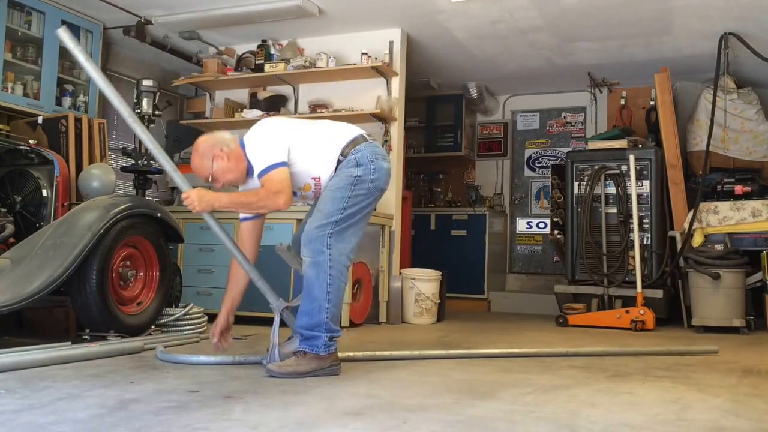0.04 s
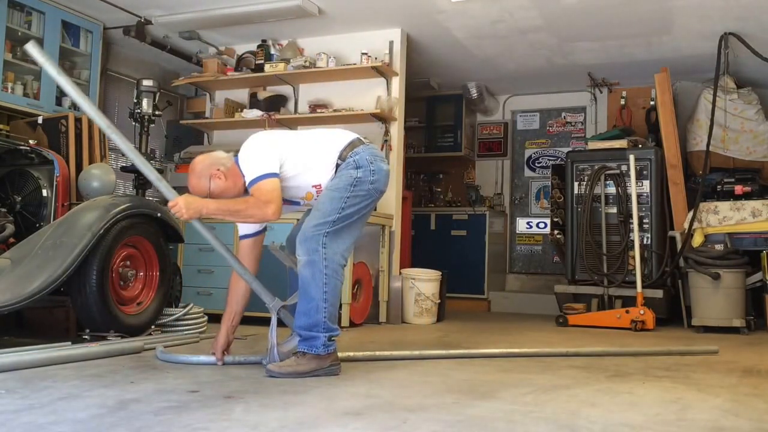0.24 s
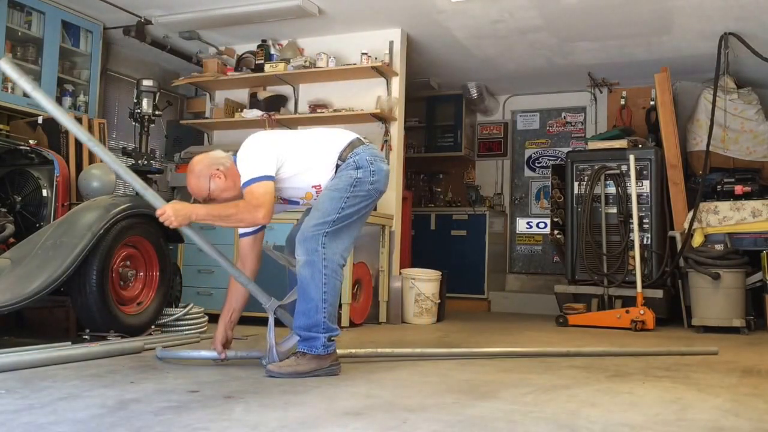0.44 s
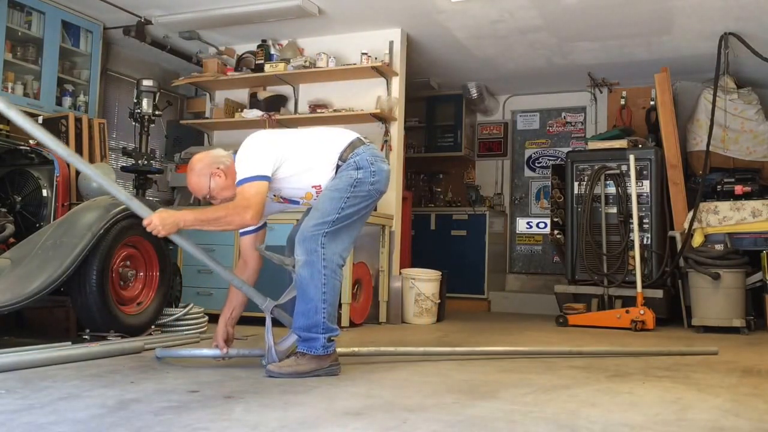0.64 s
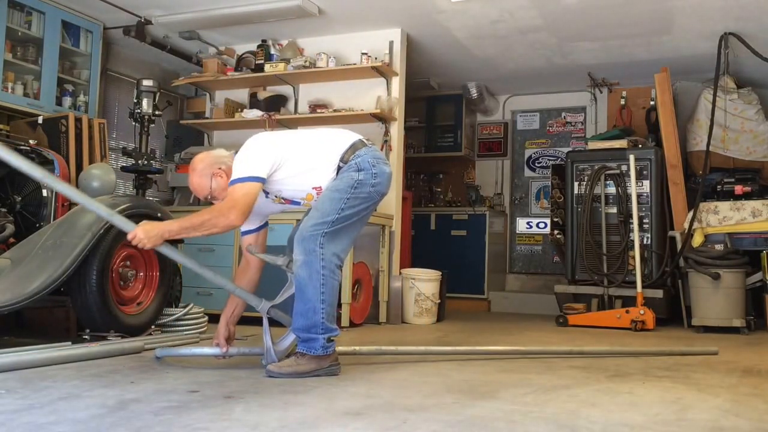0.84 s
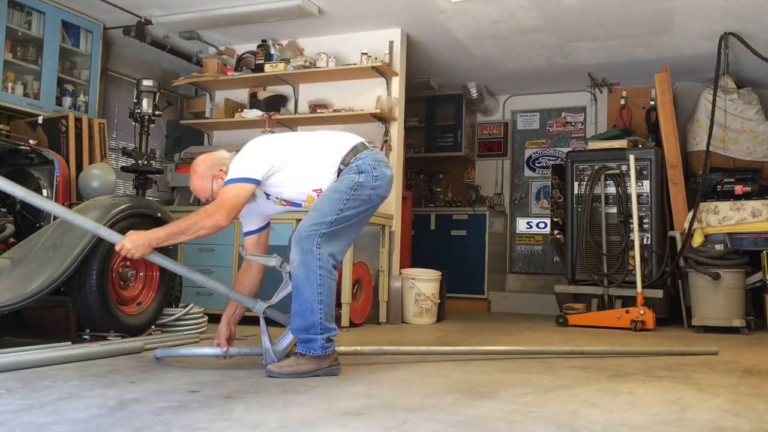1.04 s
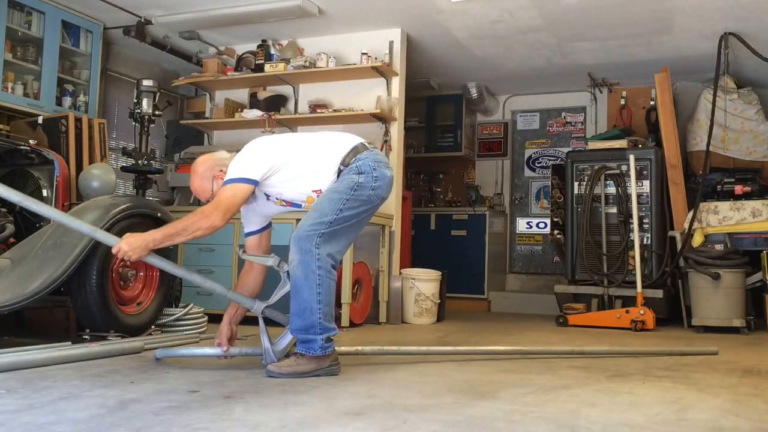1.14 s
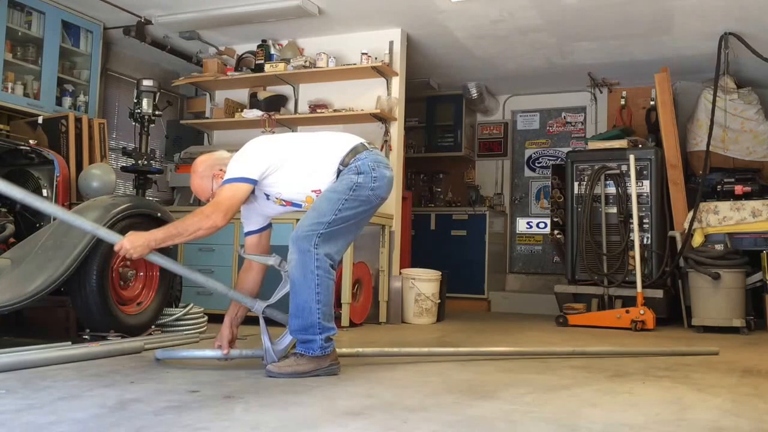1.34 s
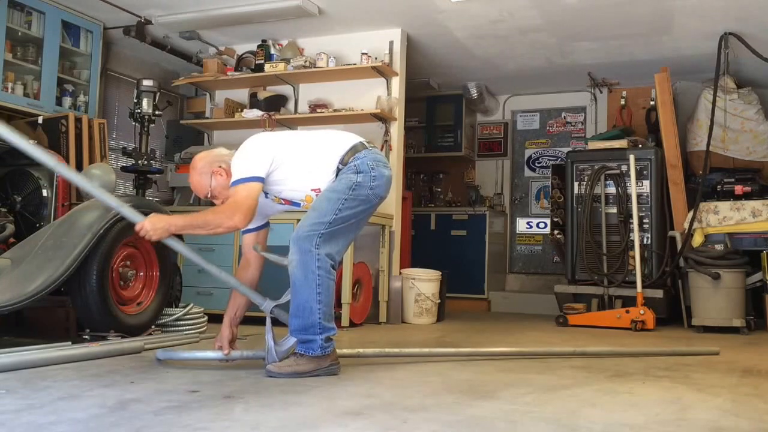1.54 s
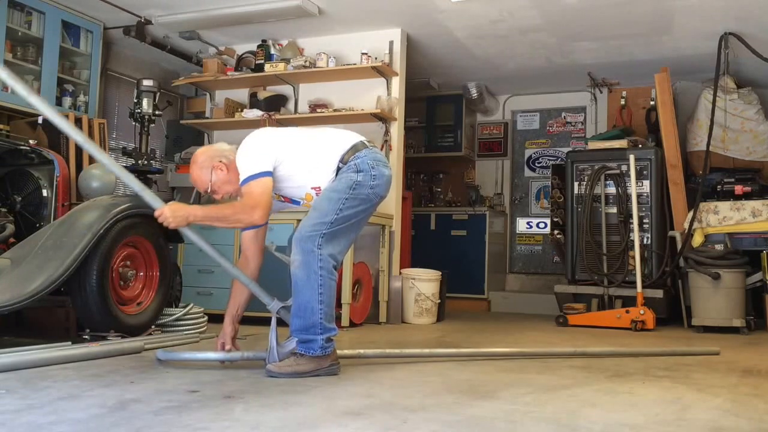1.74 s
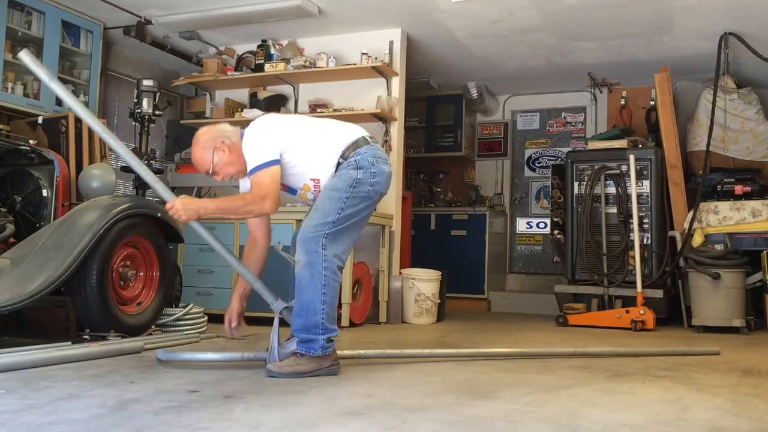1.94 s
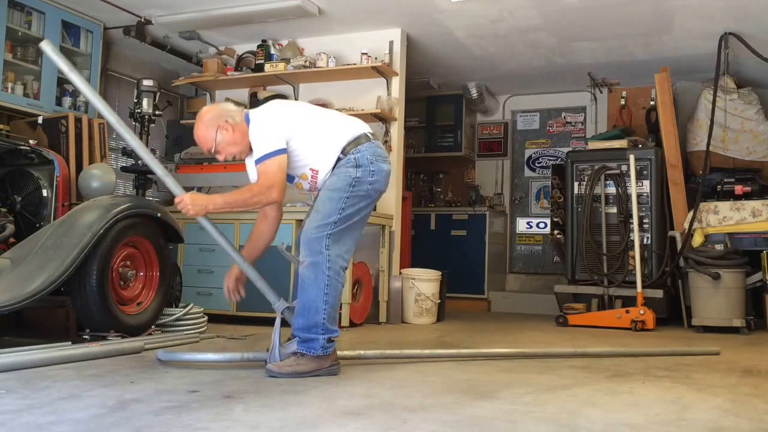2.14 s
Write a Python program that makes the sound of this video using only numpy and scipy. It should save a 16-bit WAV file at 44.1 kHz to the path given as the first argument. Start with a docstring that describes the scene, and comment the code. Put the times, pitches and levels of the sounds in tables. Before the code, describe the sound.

Steel conduit in a hand bender clanks and scrapes on a concrete garage floor in ringing clusters

```python
"""Room air and a low, wavering hum, made of shaped noise and sines, are heard from the start in a garage.
From 0.4 s a long steel conduit in a hand bender knocks on the concrete floor in clusters. Each knock
excites bending modes, a dense wall ring, a clack, a thud and a tick, and feeds one long beating high tone.
Between the clusters the tube scrapes along, made of many tiny catches that excite the same resonances.
Near 1.8 s a soft noise swish swells as the handle swings back; at 1.9 s a faint sine whine comes up."""
import sys
import numpy as np
from scipy import signal
from scipy.fft import rfft, irfft
from scipy.io import wavfile

SR = 44100
rng = np.random.default_rng(int(sys.argv[2]) if len(sys.argv) > 2 else 0)


def dump(signal):
    """Clip the signal to [-1, 1] and save it as 16-bit WAV at the path in sys.argv[1]."""
    limited = np.clip(np.atleast_2d(signal).T, -1, 1)
    pcm = np.round(limited * 32767).astype(np.int16)
    wavfile.write(sys.argv[1], SR, pcm)


N = 96623
RING_COUNT = 36000  # samples in one ring
AGE = np.arange(RING_COUNT) / SR  # seconds since a blow
TIME = np.arange(N) / SR

# Spectrum of the room air: pitch_hz, relative level_db
AIR_SPECTRUM = [(20, -18), (40, -6.5), (60, -5), (75, 11), (95, -14), (140, 0), (200, -10), (350, -15.5),
                (600, -19), (1200, -22), (4000, -27), (8000, -36), (15000, -47.5)]
AIR_DB = -56.5
# Steady tones of the hum: pitch_hz, mean level_db
HUM_TONES = [(75, -64.5), (118.5, -63.5), (494, -77)]
HUM_WAVER_DB = 1.5

# Strength of the drag over time: time_s, level_db (before the gain of each resonance)
DRAG_LEVEL = [(.37, -68.5), (.40, -38), (.46, -50), (.58, -42.5), (.66, -40.5), (.80, -40.5), (.88, -68.5),
              (.99, -49), (1.04, -48.5), (1.12, -58.5), (1.17, -52.5), (1.24, -40.5), (1.38, -34.5),
              (1.50, -65.5), (1.60, -68), (1.75, -76)]
GRAINS_PER_S, GRAIN_SPREAD_DB = 900, 2
STROKE_COUNT = 4410  # samples in one short stretch of the drag
DRAG_BENDING_DB, DRAG_WALL_DB, DRAG_TICK_DB, DRAG_RASP_DB = -7.5, -8, -5.5, -4.5
# Spectrum of the low rasp of the drag: pitch_hz, relative level_db
RASP_SPECTRUM = [(50, -22.5), (150, 4.5), (480, 0), (1000, 7), (2100, -8), (2700, -26)]

# Knocks: start_s, bending_db, blow_centre_hz, wall_db, thud_db, tick_db,
# favoured_mode_hz (the mode that the struck spot favours), favoured_db
KNOCKS = [(.390, -41, 1390, -63, -47.5, -52, 1321, -43), (.411, -30, 1850, -23, -43.5, -31, 2621, -51),
          (.428, -27.5, 1500, -34, -39.5, -51, 2342, -32.5), (.522, -47, 1520, -37, -76, -50, 1584, -42.5),
          (.549, -40.5, 1090, -43, -55, -62, 2621, -45), (0.579, -49, 1490, -42, -54, -80, 3025, -41),
          (0.701, -29, 840, -31, -35, -40, 1112, -33.5), (.721, -28.5, 1300, -27, -57, -36.5, 1840, -40.5),
          (.742, -28, 1450, -38.5, -43.5, -49, 1584, -29),
          (.759, -31.5, 1230, -24.5, -38, -39.5, 1321, -32),
          (.783, -29.5, 1310, -31.5, -48.5, -44, 1584, -34), (.799, -32, 1160, -41, -50, -48.5, 1112, -37),
          (.818, -36, 1270, -53.5, -45.5, -61, 1321, -37), (.845, -58, 1460, -59.5, -48, -78, 3025, -34),
          (0.867, -46, 1600, -62, -48, -76.5, 1584, -31), (1.026, -41, 1030, -43.5, -43, -54.5, 3025, -43),
          (1.05, -44, 1200, -53, -45, -70, 1584, -42.5), (1.25, -33.5, 1370, -30, -37.5, -37.5, 1840, -34),
          (1.279, -19.5, 1130, -25, -33, -31.5, 1112, -19.5),
          (1.299, -30, 1160, -25, -51, -31.5, 1321, -23.5),
          (1.350, -24.5, 1630, -19.5, -39, -25, 1840, -34),
          (1.360, -23, 2100, -19, -30.5, -23.5, 2342, -20),
          (1.396, -26.5, 1680, -22.5, -63, -33.5, 1840, -31), (1.43, -32, 1620, -29, -45, -40, 3025, -27),
          (1.486, -44, 1600, -59, -58, -48, 2102, -48), (1.55, -60.5, 1610, -48, -65, -76, 1584, -41.5),
          (2.181, -55.5, 1200, -58, -62.5, -71, 1584, -56)]
BLOW_WIDTH_OCT, MODE_SCATTER_DB = 0.67, 1
# Bending modes of the tube: pitch_hz, relative level_db, t60_s
BENDING_MODES = [(484, -1.5, 0.19), (562.5, -1, 0.13), (731, -1.5, 0.4), (898.6, 3, 0.21), (954, 0, 0.25),
                 (1118.5, 0.5, 0.22), (1150, -6, 0.56), (1326, 2, 0.24), (1568, -3.5, 0.49),
                 (1586, -2.5, 0.4), (1837, 5.5, 0.2), (2094, 1, 0.29), (2343.5, -6.5, 0.67),
                 (2610, -3.5, 0.83), (2830, -13.5, 0.37)]
PAIR_SPLIT_HZ = 1.1  # a bent tube has its bending modes in close pairs
# The waves need time to fill the tube: time constants in seconds
BENDING_RISE_S, FAVOURED_RISE_S, CLACK_RISE_S = 0.0044, 0.0065, 0.0025
# The tube settles on the floor, which damps its bending modes:
# start_s, end_s, above_hz (only higher pitches are damped), extra_decay_db_per_s
FLOOR_PRESSES = [(.88, 1.02, 300, 134), (0.84, 1.25, 2000, 76), (1.432, 2, 2270, 166), (1.6, 1.7, 302, 100)]

# Separate strong modes of the wall: pitch_hz, relative level_db, t60_s
WALL_MODES = [(3260, -18, .3), (3521, -14, .33), (3660, -16, .3), (3955, -17, .33), (4147, -16, .3),
              (4287, -15, .3), (4382, -17, .3), (4573, -14, .32), (5205, -17, .3), (5338, -16, .3),
              (6653, -20, .36), (6853, -24, .36), (8515, -34, .35)]
WALL_MODES_DB = 3
# Spectrum of the dense wall modes: pitch_hz, relative level_db
WALL_SPECTRUM = [(3000, 5.5), (3500, 4), (4500, 4), (5300, -8.5), (6200, -10), (7100, -17.5), (8100, -22),
                 (8650, -8.5), (10500, -32.5), (13000, -57.5), (15500, -29.5)]
# Dense wall modes start at the ovalling cutoff
WALL_CUTOFF_HZ, WALL_STEP_HZ, WALL_T60_S, WALL_DENSE_DB = 3012, 31.47, 0.26, -6

# Spectra of the clack, thud and tick of contact: pitch_hz, relative level_db
CLACK_SPECTRUM = [(60, -45.5), (200, -28), (450, -13.5), (700, -1.5), (950, -0.5), (1600, -0.5),
                  (2200, -3.5), (2480, -11), (2850, -1.5), (4000, -45)]
THUD_SPECTRUM = [(60, -31), (120, -13), (170, -3.5), (240, 0.5), (290, -16.5), (380, -1), (520, -14.5),
                 (900, 2.5), (2500, -41)]
TICK_SPECTRUM = [(100, -47.5), (1500, -27), (3500, 6), (5500, 7), (7200, -0.5), (8100, -5), (8700, -0.5),
                 (10500, -6.5), (13300, -16), (15500, -22.5)]
CLACK_DB = -4  # relative to the bending ring of a knock
CLACK_T60_S, THUD_T60_S, TICK_T60_S = 0.089, 0.049, 0.04

# The lowest ovalling mode of the wall rings longest; its level is relative to the wall ring of a knock
OVALLING_HZ, OVALLING_T60_S, OVALLING_DB = 3024.6, 0.87, -16.5
# Uneven moments at which the ovalling tone beats down to silence: dip_s
BEAT_DIPS = [.39, .53, .66, .81, .925, 1.005, 1.13, 1.23, 1.385, 1.525, 1.579, 1.615, 1.725, 1.795, 1.885,
             1.986, 2.07, 2.189]

# Reverberation time of the garage: pitch_hz, t60_s
ROOM_DECAY = [(100, 0.21), (500, 0.35), (2000, 0.42), (5000, 0.27), (10000, 0.29), (15000, 0.24)]
ROOM_ONSET_S = 0.0068
BENDING_ROOM_DB, WALL_ROOM_DB, CONTACT_ROOM_DB = -15, 7, 4.5  # reverberant against direct

# Spectrum of the swish as the handle swings back: pitch_hz, relative level_db
SWISH_SPECTRUM = [(800, -6), (2300, 3), (6500, -4), (9000, -13), (15000, -31)]
SWISH_S, SWISH_WIDTH_S, SWISH_DB = 1.827, 0.15, -59.5
WHINE_HZ, WHINE_DB, WHINE_START_S, WHINE_RISE_S = 490, -66.5, 1.91, 0.032
CUTOFF_HZ = 15450


def from_db(db):
    """Amplitude is the exponential of level: 20 dB is a factor of ten."""
    return 10 ** (np.asarray(db) / 20)


def rms_one(x):
    """Normalise a signal to unit effective value."""
    return x / np.sqrt(np.mean(x ** 2) + 1e-20)


def blow_one(x):
    """Normalise a ring to the energy of 30 ms at unit effective value."""
    return x / np.sqrt(np.sum(x ** 2) / (.03 * SR) + 1e-20)


def at_hz(points, hz):
    """Interpolate a frequency-dependent quantity along log frequency."""
    table = np.array(points)
    return np.interp(np.log(np.maximum(hz, 1)), np.log(table[:, 0]), table[:, 1])


def dying(t60):
    """Linear damping gives exponential decay, by 60 dB in t60 seconds."""
    return np.exp(-np.log(1000) * AGE / t60)


def rising(seconds):
    """Build-up approaches its final value exponentially."""
    return 1 - np.exp(-AGE / seconds)


def coloured(x, spectrum):
    """Linear filtering multiplies a spectrum by a frequency response."""
    gain = from_db(at_hz(spectrum, np.fft.rfftfreq(len(x), 1 / SR)))
    return irfft(rfft(x) * gain, len(x))


def through(x, response):
    """The output of a linear system is its input convolved with its impulse response."""
    return signal.fftconvolve(x, response)[:N]


def add(track, start_s, x):
    """Superpose a sound on a track from its start time."""
    i = int(start_s * SR)
    track[i:i + len(x)] += x[:N - i]


def room_air():
    """Broadband ambience is stationary random noise with a fixed spectrum."""
    return from_db(AIR_DB) * rms_one(coloured(rng.standard_normal(N), AIR_SPECTRUM))


def hum():
    """A hum is a sum of sines, here with slow random amplitude modulation."""
    out = np.zeros(N)
    for hz, db in HUM_TONES:
        waver = np.interp(TIME, np.linspace(0, N / SR, 16), rng.standard_normal(16))
        tone = np.sqrt(2) * np.sin(2 * np.pi * (hz * TIME + rng.random()))
        out += from_db(db + HUM_WAVER_DB * waver) * tone
    return out


def drag_grains():
    """Dry friction on rough concrete is a random train of small catches."""
    sizes = from_db(GRAIN_SPREAD_DB * np.minimum(rng.exponential(1, N), 4))
    sizes = sizes * rng.choice([-1, 1], N)
    caught = rng.random(N) < GRAINS_PER_S / SR
    grains = rms_one(sizes * caught) / np.sqrt(.03 * SR)
    return grains * from_db(np.interp(TIME, *np.transpose(DRAG_LEVEL)))


def ringing(modes):
    """Free vibration is a set of damped modes: one complex dying tone for each."""
    return np.array([from_db(db) * np.exp(2j * np.pi * hz * AGE) * dying(t60)
                     for hz, db, t60 in modes])


def strike(tones, gains):
    """Modal superposition: every blow meets each mode with a strength and phase of its own."""
    scatter = from_db(MODE_SCATTER_DB * rng.standard_normal(len(tones)))
    phase = np.exp(2j * np.pi * rng.random(len(tones)))
    return ((gains * scatter * phase) @ tones).real


def blow_db(hz, centre_hz):
    """The excitation spectrum of a blow is strongest around its centre pitch."""
    octaves = np.log2(hz / centre_hz)
    return -10 * np.log10(1 + (octaves / BLOW_WIDTH_OCT) ** 4)


def favours_ovalling(hz):
    """Nearest-mode rule: is a pitch closer to the ovalling mode than to the top bending mode?"""
    return hz > (BENDING_MODES[-1][0] + OVALLING_HZ) / 2


def favoured(hz):
    """Two bending modes of nearly equal pitch interfere and beat slowly."""
    if favours_ovalling(hz):
        return 0  # that energy feeds the ovalling tone instead
    nearest = min(BENDING_MODES, key=lambda mode: abs(mode[0] - hz))
    tone = (ringing([nearest])[0] * np.exp(2j * np.pi * rng.random())).real
    beat = np.cos(np.pi * PAIR_SPLIT_HZ * AGE)
    return blow_one(tone * beat * rising(FAVOURED_RISE_S))


def pressed(ring, start_s):
    """Contact damping: while the tube presses on the floor, its bending ring dies faster."""
    hz = np.fft.rfftfreq(RING_COUNT, 1 / SR)
    for begin, end, above_hz, db_per_s in FLOOR_PRESSES:
        high_pass = 1 - 1 / (1 + (hz / above_hz) ** 80)
        upper = irfft(rfft(ring) * high_pass, RING_COUNT)
        held_s = np.clip(start_s + AGE, begin, end) - np.clip(start_s, begin, end)
        ring = ring - upper * (1 - from_db(-db_per_s * held_s))
    return ring


def dense_wall():
    """Dispersion above cutoff sends waves along the tube as falling chirps; returns a ring per place."""
    order = np.arange(9, 480)
    axial_hz = order * WALL_STEP_HZ
    hz = np.hypot(WALL_CUTOFF_HZ, axial_hz)
    gain = from_db(at_hz(WALL_SPECTRUM, hz)) * np.sqrt(axial_hz / hz)
    waves = np.sin(np.outer(2 * np.pi * hz, AGE).astype(np.float32))
    fade = dying(WALL_T60_S)

    def ring_at(place):
        """Mode shapes set the excitation at a place of contact, a fraction of the length."""
        shape = np.cos(np.pi * order * place) + .5 * rng.standard_normal(len(hz))
        return blow_one(((gain * shape).astype(np.float32) @ waves) * fade)

    return ring_at


def burst(spectrum, t60):
    """A brief contact radiates shaped noise with exponential decay."""
    return blow_one(coloured(rng.standard_normal(RING_COUNT), spectrum) * dying(t60))


def floor_contact(bend_db, centre_hz, thud_db, tick_db):
    """Impact noise superposes a clack, a dull floor thud and a bright tick."""
    spectrum = [(hz, db + blow_db(hz, centre_hz) / 2) for hz, db in CLACK_SPECTRUM]
    clack = burst(spectrum, CLACK_T60_S) * rising(CLACK_RISE_S)
    thud = burst(THUD_SPECTRUM, THUD_T60_S)
    tick = burst(TICK_SPECTRUM, TICK_T60_S)
    return from_db(bend_db + CLACK_DB) * clack + from_db(thud_db) * thud + from_db(tick_db) * tick


def ovalling():
    """A lightly damped mode stores energy: knocks feed one long tone, which beats between its dips."""
    energy = np.zeros(N)
    envelope = dying(OVALLING_T60_S) * rising(FAVOURED_RISE_S)
    for start_s, _, _, wall_db, _, _, mode_hz, mode_db in KNOCKS:
        fed = from_db(wall_db + OVALLING_DB) ** 2
        fed += favours_ovalling(mode_hz) * from_db(mode_db) ** 2
        add(energy, start_s, fed * envelope ** 2)
    beat = np.pi * np.interp(TIME, BEAT_DIPS, np.arange(len(BEAT_DIPS)))
    tone = np.sin(2 * np.pi * (OVALLING_HZ * TIME + rng.random()))
    return np.sqrt(energy * np.sin(beat) ** 2) * tone


def garage():
    """Diffuse reverberation is noise of unit energy whose bands decay at their own rates."""
    hz = np.fft.rfftfreq(RING_COUNT, 1 / SR)
    white = rfft(rng.standard_normal(RING_COUNT))
    edges = np.geomspace(40, 20000, 10)
    tail = np.zeros(RING_COUNT)
    for low, high in zip(edges, edges[1:]):
        band = irfft(white * ((hz >= low) & (hz < high)), RING_COUNT)
        tail += band * dying(at_hz(ROOM_DECAY, np.sqrt(low * high)))
    tail *= 1 - np.exp(-(AGE / ROOM_ONSET_S) ** 2)
    return tail / np.sqrt(np.sum(tail ** 2))


def conduit():
    """Forced resonance: drag and knocks excite bending, wall and contact, each heard direct and reverberant."""
    bend_tones = ringing(BENDING_MODES)
    wall_tones = from_db(WALL_MODES_DB) * ringing(WALL_MODES)
    dense = dense_wall()
    bending, wall, contact = np.zeros((3, N))

    drag = drag_grains()
    catch = blow_one(strike(bend_tones, 1) + 2 * burst(CLACK_SPECTRUM, CLACK_T60_S))
    catch = from_db(DRAG_BENDING_DB) * catch
    for i in range(0, N, STROKE_COUNT):
        stroke = signal.fftconvolve(drag[i:i + STROKE_COUNT], catch)[:RING_COUNT]
        add(bending, i / SR, pressed(stroke, i / SR))
    wall += from_db(DRAG_WALL_DB) * through(drag, dense(rng.uniform(.06, .092)))
    contact += from_db(DRAG_TICK_DB) * through(drag, burst(TICK_SPECTRUM, TICK_T60_S))
    contact += from_db(DRAG_RASP_DB) * through(drag, burst(RASP_SPECTRUM, TICK_T60_S))

    bend_hz = np.array(BENDING_MODES)[:, 0]
    for start_s, bend_db, centre_hz, wall_db, thud_db, tick_db, mode_hz, mode_db in KNOCKS:
        bend = strike(bend_tones, from_db(blow_db(bend_hz, centre_hz))) * rising(BENDING_RISE_S)
        bend = from_db(bend_db) * blow_one(bend) + from_db(mode_db) * favoured(mode_hz)
        # the separate wall modes share the bending track's room balance
        add(bending, start_s, pressed(bend, start_s) + from_db(wall_db) * strike(wall_tones, 0.96))
        add(wall, start_s, from_db(wall_db + WALL_DENSE_DB) * dense(rng.uniform(.0606, .16)))
        add(contact, start_s, floor_contact(bend_db, centre_hz, thud_db, tick_db))
    bending += ovalling()

    room = garage()
    out = np.zeros(N)
    for x, db in ((bending, BENDING_ROOM_DB), (wall, WALL_ROOM_DB), (contact, CONTACT_ROOM_DB)):
        room_gain = from_db(db)
        out += (x + room_gain * through(x, room)) / np.hypot(1, room_gain)
    return out


def swish():
    """Smooth sliding noise: shaped random noise under a Gaussian swell."""
    swell = np.exp(-((TIME - SWISH_S) / SWISH_WIDTH_S) ** 2)
    return from_db(SWISH_DB) * swell * rms_one(coloured(rng.standard_normal(N), SWISH_SPECTRUM))


def whine():
    """A pure tone is a single sine, here with a linear onset."""
    onset = np.clip((TIME - WHINE_START_S) / WHINE_RISE_S, 0, 1)
    return from_db(WHINE_DB) * onset * np.sqrt(2) * np.sin(2 * np.pi * WHINE_HZ * TIME)


def scene():
    """Superposition: the sources add linearly into one channel."""
    return (room_air() + hum() + conduit() + swish() + whine())[None]


def record(dry):
    """Band limiting: a steep elliptic low-pass removes the top."""
    low_pass = signal.ellip(12, .2, 80, CUTOFF_HZ, fs=SR, output="sos")
    return signal.sosfilt(low_pass, dry)


dry = scene()
out = record(dry)
dump(out)
```